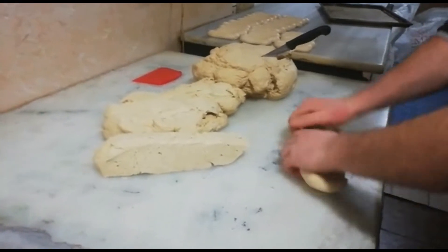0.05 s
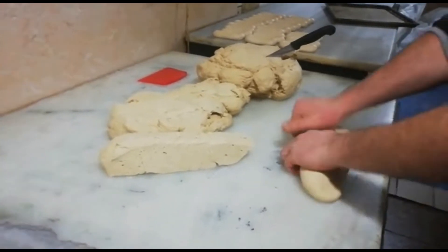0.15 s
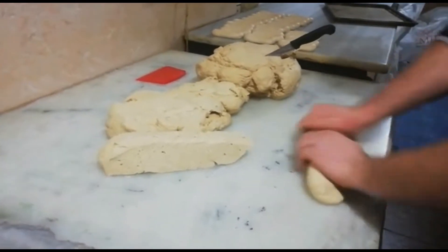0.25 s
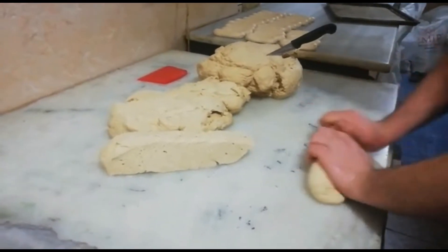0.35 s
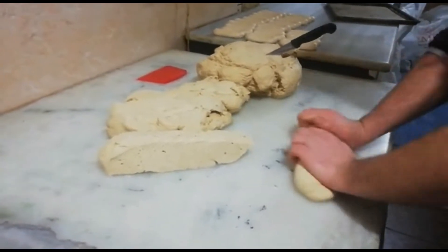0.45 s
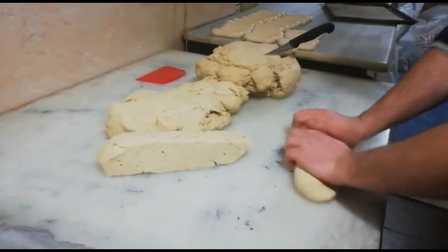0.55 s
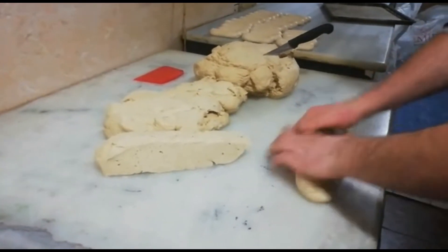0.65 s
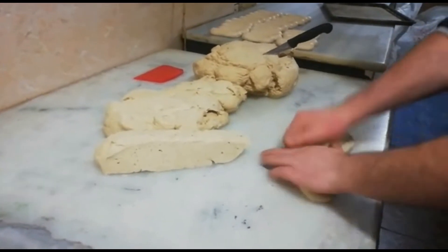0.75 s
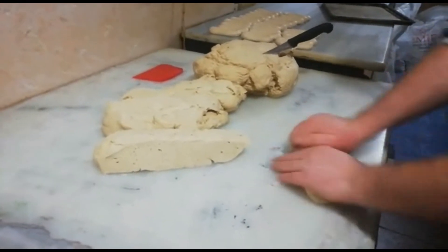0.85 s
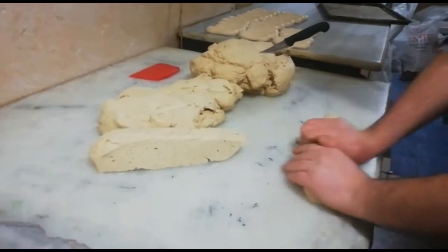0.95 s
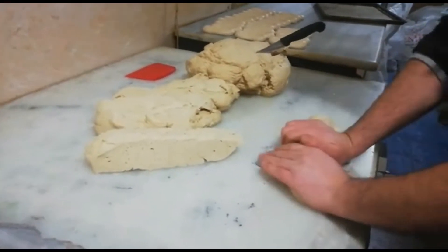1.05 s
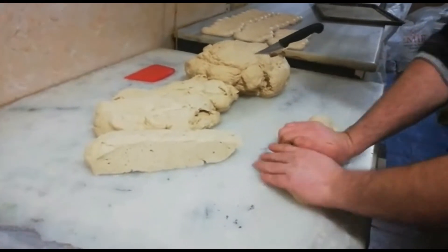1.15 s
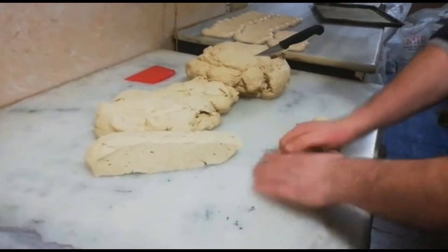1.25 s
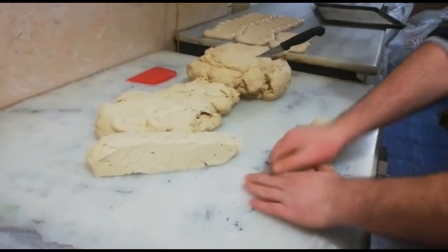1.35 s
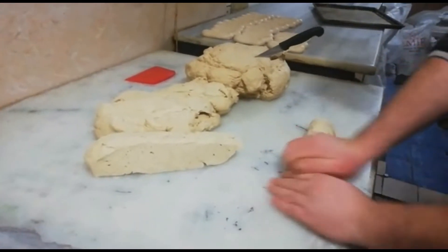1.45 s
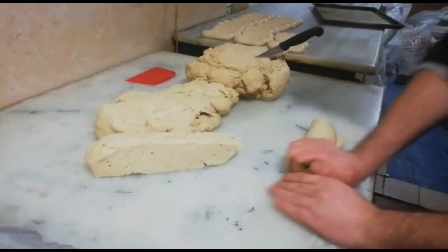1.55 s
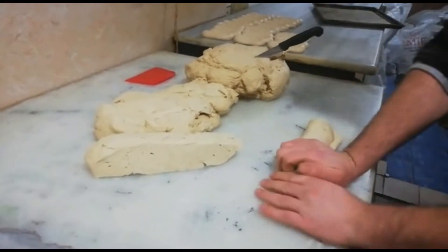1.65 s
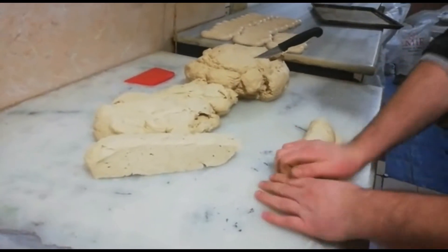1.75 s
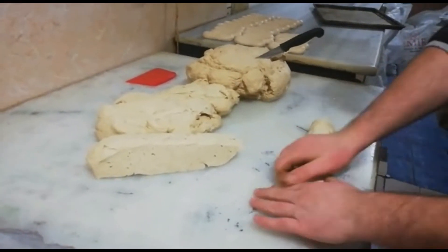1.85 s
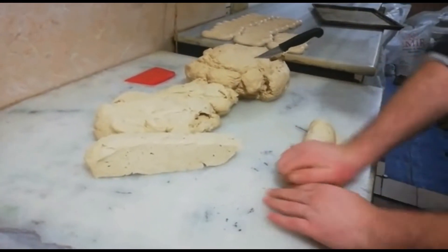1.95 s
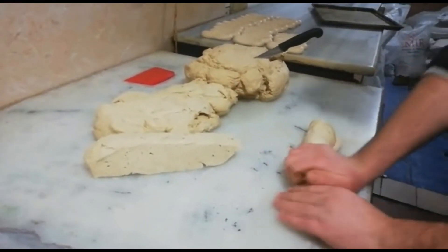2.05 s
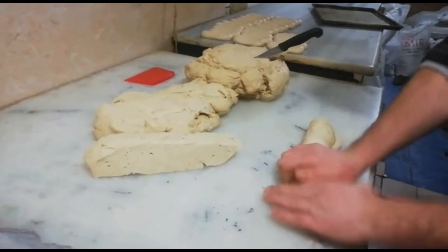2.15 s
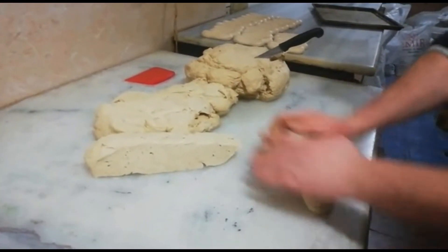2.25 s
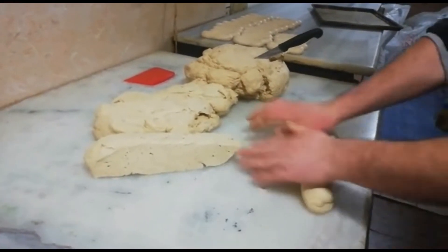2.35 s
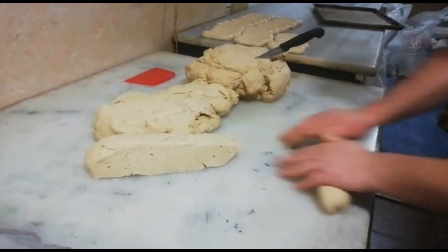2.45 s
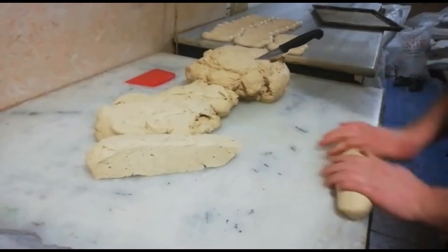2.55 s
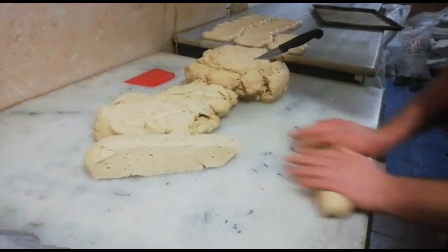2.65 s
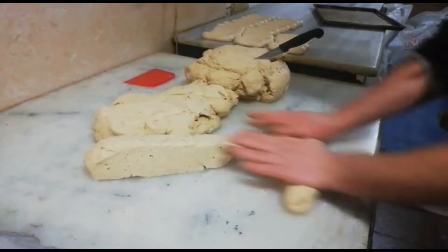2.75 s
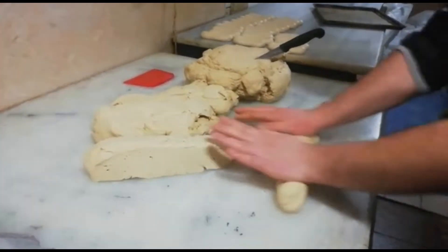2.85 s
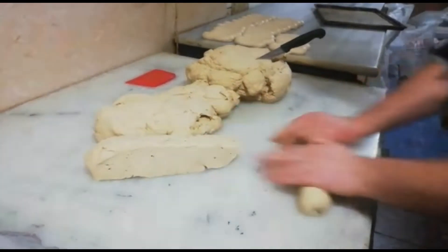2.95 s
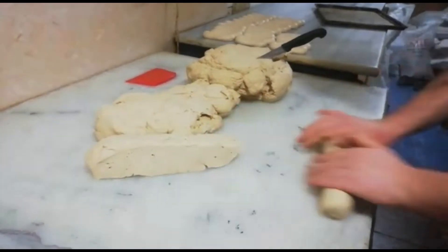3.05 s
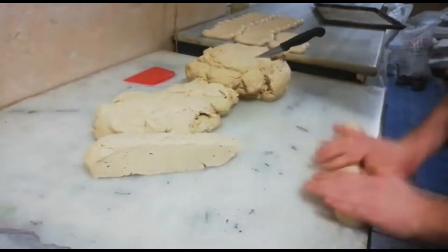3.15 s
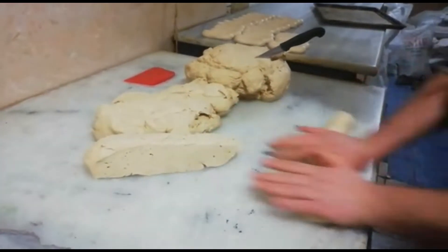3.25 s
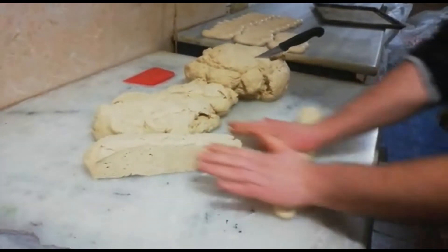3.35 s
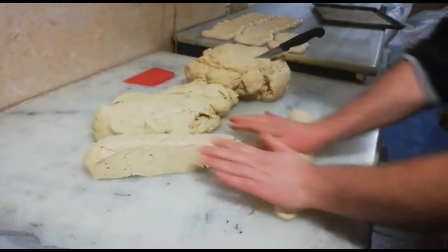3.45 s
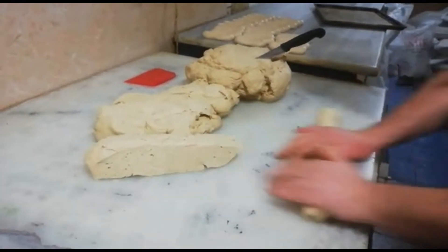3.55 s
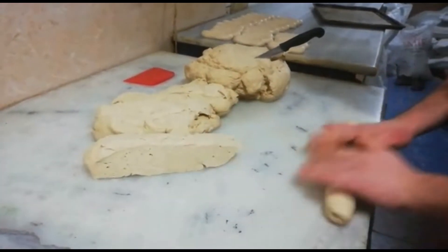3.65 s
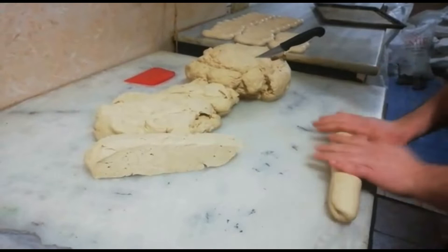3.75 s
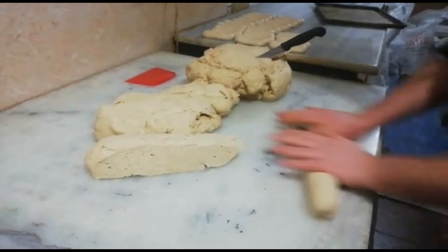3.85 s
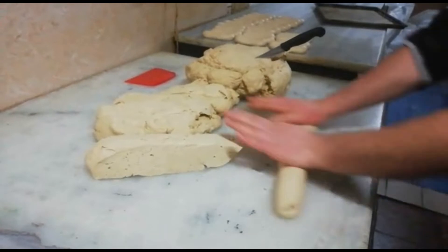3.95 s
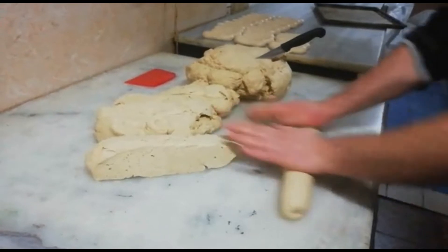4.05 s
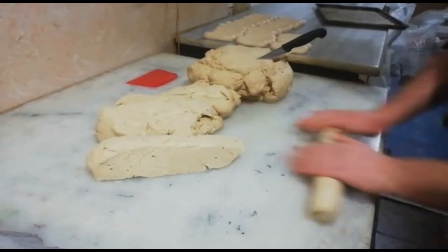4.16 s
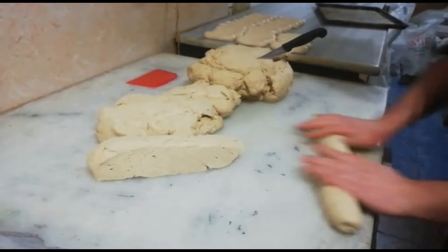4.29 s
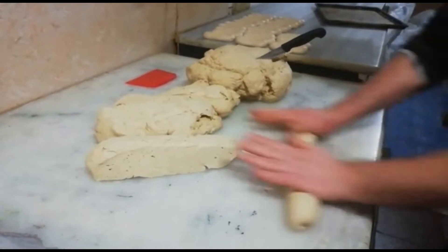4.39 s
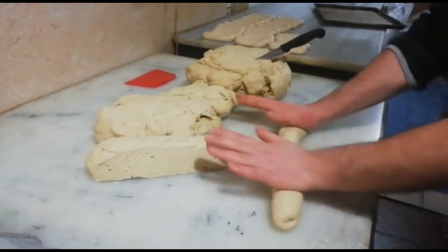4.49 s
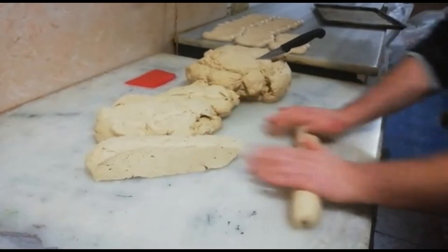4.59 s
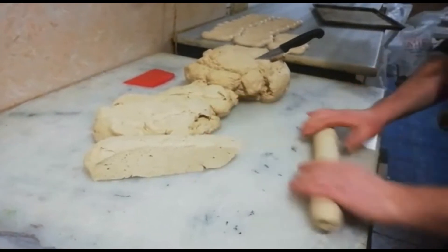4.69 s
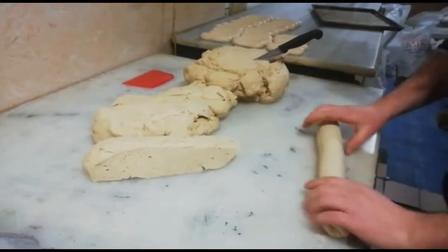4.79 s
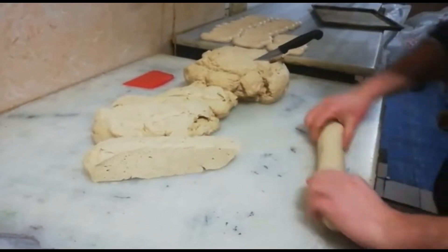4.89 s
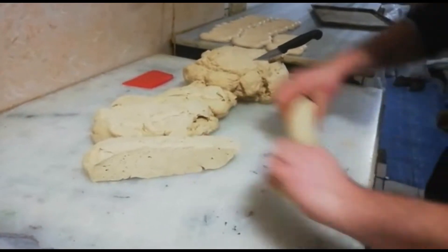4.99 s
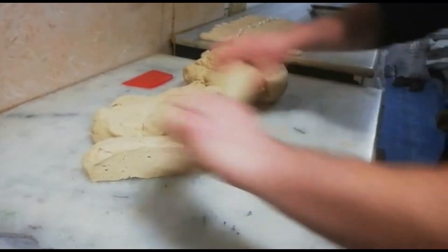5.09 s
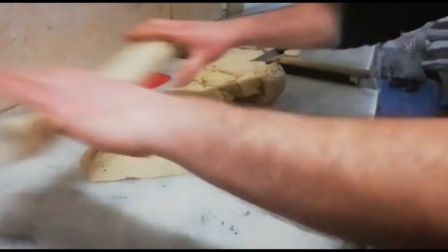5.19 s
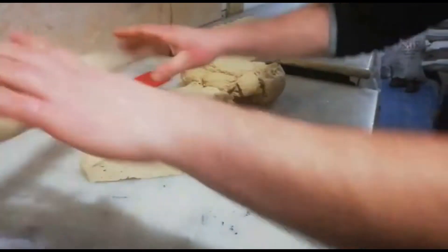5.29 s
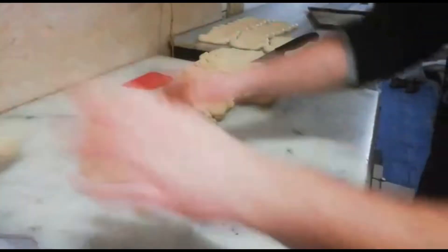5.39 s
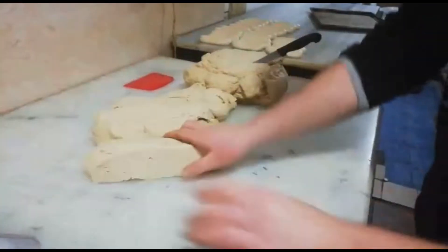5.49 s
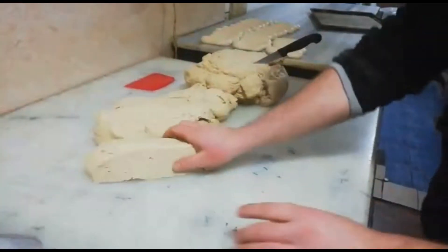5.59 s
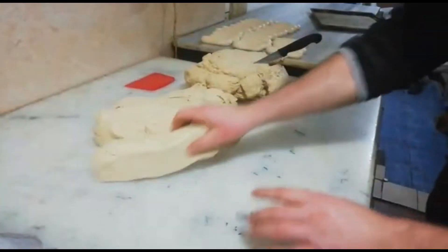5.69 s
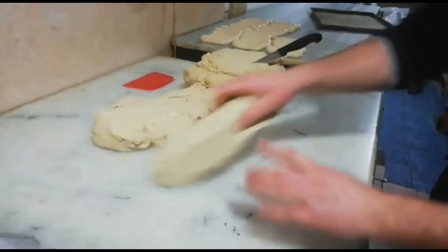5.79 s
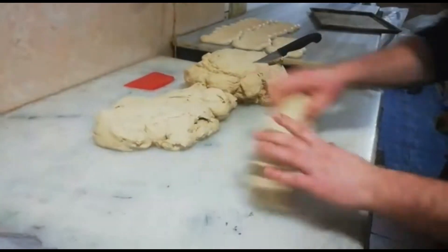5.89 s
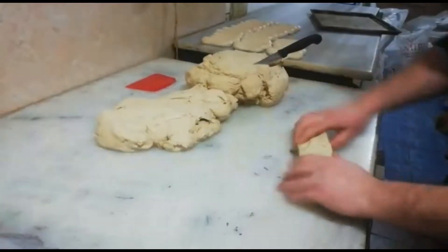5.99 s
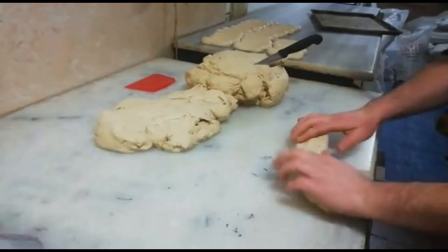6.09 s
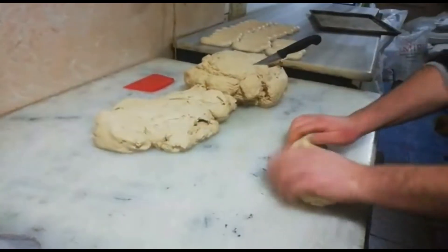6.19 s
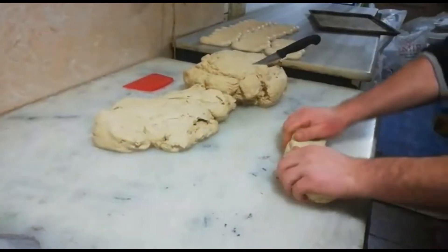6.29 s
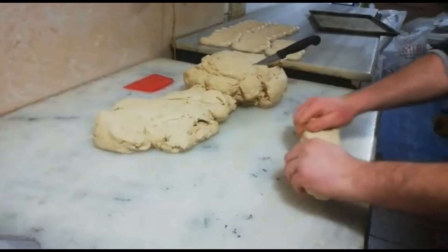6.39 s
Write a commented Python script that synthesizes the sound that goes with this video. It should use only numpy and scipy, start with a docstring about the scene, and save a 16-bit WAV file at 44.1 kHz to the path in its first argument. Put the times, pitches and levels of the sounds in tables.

```python
"""In a hard-walled bakery, dough is kneaded and rolled by hand on a stone-topped work table.
Pushes knock and judder the table's modes, soft blows rock its frame, and palms scuff as shaped noise.
A roll is slapped on the far side (cracks and a splash of noise), a slab is dropped; a cooling unit
hums in steady lines. Two microphones stand a hand apart, the baker nearer the right one."""
import sys
import numpy as np
from scipy import signal
from scipy.io import wavfile

SR = 44100
rng = np.random.default_rng(int(sys.argv[2]) if len(sys.argv) > 2 else 0)


def pcm_store(signal):
    """Save signal as 16-bit PCM."""
    levels = np.round(np.clip(np.atleast_2d(signal), -1, 1) * 32767)
    wavfile.write(sys.argv[1], SR, levels.astype(np.int16).T)


N = 283695

# room air: (frequency [Hz], relative level [dB per Hz])
AIR_SPECTRUM = [(20, -11), (50, 6.5), (80, -2), (130, -4), (200, -4), (260, -9), (400, -14.5), (630, -21.5),
                (1300, -19), (2500, -20.5), (5000, -25), (7500, -23), (10500, -24), (15700, -24)]
AIR_DB = -60.5   # rms
# motor and mains lines of the cooling unit: (frequency [Hz])
HUM_HZ = [91.3, 100, 145.4, 290.8, 295.8, 678.5, 969.2, 1017.7]
# mean strength of those lines: (rms level [dB])
HUM_DB = [-65, -63.5, -72, -81.5, -78, -84.5, -74.5, -73]
# decay of the echo: (frequency [Hz], t60 [s])
WALLS = [(60, 0.35), (300, 0.38), (1500, 0.42), (6000, 0.42), (14000, 0.25)]
# left-right correlation of noise: (frequency [Hz], likeness [0 to 1])
LIKENESS = [(30, 0.98), (150, 1), (400, 0.33), (2000, 0.077), (12000, 0.076)]
# airy whistle of two fast strokes: (start [s], length [s], upper band [Hz], lower band [Hz], level [dB])
WHISTLES = [(3.4, .22, 9400, 4210, -58.5), (3.902, .1, 8650, 4370, -58.5)]
# short bright puffs of contact, skin on dough, dough on stone, the slab's first edge landing:
# (time [s], peak [dB], colour [Hz], t60 [s])
CONTACTS = [(0.0375, -51, 6100, 0.043), (0.1524, -41, 4830, 0.041), (0.6183, -39, 6100, .05),
            (0.7824, -36, 5000, 0.061), (1.0574, -35, 2470, 0.069), (1.058, -40.5, 4800, 0.074),
            (1.2144, -50, 5760, 0.078), (1.783, -45, 6340, 0.035), (3.31, -55, 8300, 0.047),
            (4.046, -43.5, 9000, 0.036), (4.83, -42.5, 1280, 0.26), (5.2041, -48.5, 7500, 0.022),
            (5.6974, -30, 7540, .03), (6.012, -31, 2270, 0.035), (6.017, -26.5, 6550, 0.061),
            (6.277, -40, 1720, 0.013)]
# flat of the hand on the roll: (time [s], peak [dB], factor on t60 [1])
PATS = [(3.189, -45, 0.5), (3.784, -41, 1.3)]
# a pat's thump and bright smack: (frequency [Hz], relative peak [dB], t60 [s])
PAT_PARTS = [(803, 0, 0.09), (3700, -2.5, .22), (6470, 0.5, .12)]
# noise splash of the slap: (frequency [Hz], peak [dB], t60 [s])
SLAP_SPLASH = [(264, -38, 0.64), (730, -30, .44), (2160, -30.5, 0.27), (4370, -23.5, 0.14),
               (7740, -26.5, 0.62), (12000, -30, 0.23)]
# noise splash of the dropped slab: (frequency [Hz], peak [dB], t60 [s])
DROP_SPLASH = [(298, -43, 0.13), (950, -33.5, 0.19), (1850, -20.5, 0.017), (3070, -26, 0.023),
               (6340, -21, 0.094)]
# fine hiss of skin on flour: (frequency [Hz], relative level [dB per Hz])
HISS_SPECTRUM = [(1000, -4.5), (1800, 2.5), (3000, 1), (4300, 5.5), (5500, 3.5), (7800, 9.5), (9500, 4),
                 (11500, -2), (15700, -7)]
# dull drag of dough: (frequency [Hz], relative level [dB per Hz])
DRAG_SPECTRUM = [(300, -25), (700, 1.5), (1100, 2.5), (1800, -6), (2600, 1), (4000, -71)]
# palms and dough over floured stone:
# (loudest at [s], hiss level [dB], swell [s], fade [s], drag relative to the hiss [dB], held to -5 at most)
STROKES = [(0.041, -45.5, 0.052, 0.074, -8.5), (0.158, -53.5, 0.12, 0.26, -4),
           (0.434, -57.5, 0.026, 0.08, -7), (0.652, -42, 0.039, 0.074, -12), (0.78, -49, 0.065, 0.26, -2),
           (1.0, -55.5, .02, 0.13, -12), (1.07, -49.5, 0.022, 0.067, 2), (1.225, -47.5, 0.02, 0.15, -9),
           (1.43, -57, .06, 0.089, -26), (1.53, -54, 0.1, 0.044, -28), (1.67, -55.5, 0.12, 0.078, -20),
           (1.787, -50, 0.02, 0.12, -11), (1.975, -59.5, .08, 0.21, -14), (2.21, -59, .015, .1, -9),
           (2.268, -53, .07, 0.063, -8.5), (2.462, -53.5, 0.035, .2, -12), (2.645, -54, .05, 0.34, -30),
           (2.84, -55.5, .2, .07, -13), (3.02, -53, 0.086, 0.14, -14), (3.12, -53, 0.092, 0.11, -21),
           (3.194, -52, 0.01, 0.035, -5), (3.318, -61, 0.049, 0.046, -12), (3.51, -56, 0.31, 0.3, -9.5),
           (3.788, -52, 0.01, 0.094, -17), (3.96, -57.5, 0.12, 0.18, -9), (4.158, -56.5, 0.062, 0.15, -2),
           (4.452, -58.5, 0.19, 0.16, -11), (4.625, -54.5, 0.076, 0.18, -8), (4.81, -50.5, .12, .14, -16.5),
           (5.09, -65.5, .05, 0.075, -13), (5.204, -62.5, .012, .04, -7), (5.62, -53.5, 0.11, 0.081, -14),
           (5.701, -43.5, 0.075, .05, -19.5), (5.77, -49, 0.066, 0.065, -32),
           (6.021, -45, 0.021, 0.069, -3), (6.29, -52.5, 0.27, .06, -12.5), (6.385, -44, 0.061, 0.16, -23)]
# weight of hands or dough coming down:
# (time [s], relative level [dB], tilt of the frame modes [dB per octave], factor on their t60 [1])
THUDS = [(0.124, -38, -13.5, 0.93), (0.251, -47.5, -3, 1.7), (.33, -47, -1, 1.3), (0.748, -31, -4, 0.67),
         (0.861, -52, 2, 4), (0.952, -41, 2, 0.96), (1.328, -42, -3, 0.96), (1.541, -57, -14, 1),
         (1.881, -43, -4, 0.96), (2.461, -44.5, 1, 1.3), (2.969, -50, 3, 0.53), (3.0, -36, 0.5, 0.52),
         (3.205, -49.5, -15.5, 1.7), (3.551, -49, 0, 2), (3.786, -46.5, -7, 1.7), (3.82, -43, -16, 0.42),
         (4.137, -51, -4, 0.92), (4.94, -48.5, 10.5, 0.49), (5.452, -36.5, 7.5, 3.17),
         (6.018, -36.5, -11, 1.4), (6.063, -39, 9, 1.16), (6.263, -58.5, 21.5, 1.6),
         (6.331, -48.5, -2, 0.52)]
# modes of legs and top as a whole: (frequency [Hz], relative level [dB], t60 [s])
FRAME_MODES = [(29.7, -4.5, 0.13), (42.6, -2, 0.07), (63.1, 3, 0.18), (100, -4.5, 0.23),
               (133.4, -4.5, 0.15), (157.3, -21.5, 0.26)]
# contacts of the slap, each three cracks: (time [s], relative peak [dB])
SLAP_CONTACTS = [(5.4492, -20), (5.4532, -7), (5.4606, -12.5), (5.4693, -21), (5.4778, -28)]
# crack colour at the left microphone: (frequency [Hz], width [Hz], level [dB])
SLAP_LEFT = [(1200, 2400, -5), (4130, 1700, 1), (9100, 2900, 0)]
# crack colour at the right microphone: (frequency [Hz], width [Hz], level [dB])
SLAP_RIGHT = [(1200, 660, -15.5), (4270, 650, -20), (6700, 1000, 3.5), (10000, 2200, 2.5)]
# pushes that rock the table: (time [s], relative knock level [dB], tilt of the modes [dB per octave])
PUSHES = [(0.12, -22.5, -5), (0.151, -21.5, 0), (0.355, -28.5, -0.5), (0.407, -46.5, 1.5), (0.53, -42, 1),
          (0.62, -54, 9.5), (0.746, -27.5, -5.5), (0.784, -18.5, -0.5), (0.847, -38, 3), (0.949, -35, -5),
          (0.996, -27, 0.5), (1.019, -45.5, 7), (1.332, -35, -2.5), (1.88, -36.5, -4.5), (1.919, -56, -9),
          (2.455, -48.5, 1), (2.972, -46, -3.5), (3.535, -46.5, -1.5), (4.131, -43.5, -2.5),
          (4.629, -59, 2), (5.732, -51.5, 2), (6.021, -30.5, -3), (6.262, -38, -9.5), (6.309, -49, -9)]
# modes of the top: (frequency [Hz], relative level [dB], longest t60 [s])
TABLE_MODES = [(229.7, -3.5, 0.072), (278, -3, 0.063), (359.6, -2, 0.086), (398.7, -2.5, 0.045),
               (452, -14.5, 0.029), (519.6, -5, 0.045), (596, -28, 0.041), (717, -4, 0.053),
               (733, -2.5, 0.057), (826, 3, 0.029), (914, 1, 0.059), (966, 3.5, .04), (1034, -12.5, .04),
               (1077, 3.5, 0.021), (1264, -3, 0.0099), (1478, -3, 0.03), (1506, -10.5, 0.016),
               (1644, -1.5, 0.029), (1865, -5.5, 0.016), (2110, -14, 0.0054), (2280, -7, 0.013),
               (2520, -12.5, 0.013)]
# difference in colour of the microphones: (frequency [Hz], left minus right [dB])
LEFT_MINUS_RIGHT = [(110, 0), (380, -2.5), (2400, -3), (4400, -5.5), (8100, -4), (15000, 2.5)]
# fall of both microphones above their port resonance: (frequency [Hz], level [dB])
MICROPHONE = [(9300, 0.5), (10400, -6.5), (15000, -5.5)]

EDGES_HZ = 20 * 2 ** (np.arange(30) / 3)   # third octaves
LEFT_LAG, SLAP_LEAD = 26, 20   # samples
CUTOFF_HZ = 15800
WHISTLE_FALL = 0.12   # share by which the upper band sinks over a stroke
CONTACT_WIDTH, PAT_WIDTH = 1.444, 1.235   # colour band reaches this factor above and below its centre
SLAP_S, DROP_S = 5.451, 6.024
STROKE_DEPTH_DB, STROKE_ROUNDING = 12.5, 1.25   # drop over one swell or fade time; above 1 rounds the top
# a heavier drag also fills the lower part of the hiss, dB per dB
HISS_SPLIT_HZ, LOW_HISS_FOLLOWS, USUAL_DRAG_DB = 4600, 0.33, -12
CRACK_SPREAD_S = .0016
JUDDER_T60_S, JUDDER_S_PER_DB = .25, 0.0121   # for a -30 dB knock, at 400 Hz; softer pushes judder longer
SLIPS_PER_S, SLIP_SHARE = 900, 0.33   # share: size of slips against the knock, before their own spread
HIGH_MODES_QUIETEN = 0.4   # power of pitch by which the judder dies sooner
OPPOSITE = np.array([[1], [-1]])   # side signal: plus on the left, minus on the right


def from_db(db):
    """Logarithmic level: decibels become an amplitude gain."""
    return 10 ** (np.asarray(db) / 20)


def rms_one(x):
    """Normalisation of mean power: the signal is scaled to rms 1."""
    return x / np.sqrt(np.mean(x ** 2) + 1e-20)


def at_hz(points, hz):
    """Logarithmic pitch: a (frequency, value) table is read on a log axis."""
    table_hz, values = np.array(points)[:, :2].T
    return np.interp(np.log(hz), np.log(table_hz), values)


def bandpass(x, low_hz, high_hz):
    """Band limitation by a Butterworth filter."""
    return signal.sosfilt(signal.butter(2, [low_hz, high_hz], "band", fs=SR, output="sos"), x)


def drift(rate_hz):
    """Low-passed random fluctuation of rms 1, computed at every 40th sample."""
    r = np.exp(-80 * np.pi * rate_hz / SR)
    slow = signal.lfilter([1], [1, -2 * r, r * r], rng.standard_normal(N // 40 + 2002))[2000:]
    return np.interp(np.arange(N) / 40, np.arange(len(slow)), rms_one(slow))


def ring(x, hz, t60):
    """Damped resonance: a unit click starts a decaying sine of initial height 1."""
    r, w = from_db(-60 / (t60 * SR)), 2 * np.pi * hz / SR
    return signal.lfilter([0, np.sin(w)], [1, -2 * r * np.cos(w), r * r], x + 1e-18)


def at_times(times, sizes):
    """Impulsive excitation: a train of single-sample clicks."""
    clicks = np.zeros(N)
    np.add.at(clicks, (np.asarray(times) * SR).astype(int), sizes)
    return clicks


def near(pair):
    """Arrival-time difference: sound from the baker's side reaches the left microphone later."""
    return np.array([np.roll(pair[0], LEFT_LAG), pair[1]])


def bands(white):
    """Third-octave analysis of mid and side noise; neighbouring bands are unrelated."""
    for k, (low, high) in enumerate(zip(EDGES_HZ, EDGES_HZ[1:])):
        yield np.sqrt(low * high), bandpass(white[k % 2], low, high)


def coloured(spectrum, patchy_db, alike_power):
    """Spectral shaping and partial coherence: each noise band has its level, flicker and likeness; rms 1."""
    out, together = 0, drift(27.0)
    for hz, (mid, side) in bands(rng.standard_normal((2, 2, N))):
        alike = np.clip(at_hz(LIKENESS, hz), 0, 1) ** alike_power
        flicker_db = patchy_db * (0.31 * together + drift(34.5))
        gain = from_db(at_hz(spectrum, hz) + flicker_db)
        out = out + gain * (np.sqrt(1 + alike) * mid + np.sqrt(1 - alike) * side * OPPOSITE)
    return rms_one(out)


def hum():
    """Steady tonal lines of the cooling unit; phase difference between microphones grows with pitch."""
    out, t = 0, np.arange(N) / SR
    for hz, db in zip(HUM_HZ, HUM_DB):
        phase = 2 * np.pi * (hz * t + rng.random()) + hz / 500 * np.array([[0], [1]])
        out = out + from_db(db + 1.36 * drift(2.5)) * np.sqrt(2) * np.sin(phase)
    return out


def air():
    """Broadband ambient noise: the air of the room."""
    return from_db(AIR_DB) * coloured(AIR_SPECTRUM, patchy_db=0.64, alike_power=1.3)


def room(x):
    """Diffuse reverberation: noise dying band by band, coherent between microphones only in the bass."""
    t, tail = np.arange(SR) / SR, 0
    for hz, pair in bands(rng.standard_normal((2, 2, SR))):
        t60 = at_hz(WALLS, hz)
        apart = min(hz / 400, 1) ** 7.9
        # band energy grows with its width and decay time
        mid, side = [rms_one(noise * from_db(-60 * t / t60)) * np.sqrt(hz * t60) for noise in pair]
        tail = tail + mid + apart * side * OPPOSITE
    tail = tail * (1 - np.exp(-t / 0.00076))
    tail = tail / np.sqrt(np.sum(tail ** 2) / 2)
    return signal.fftconvolve(x[None], tail, axes=1)[:, :N]


def whistle():
    """Amplitude modulation of a carrier by slow noise: two narrow bands swell and fade with the stroke."""
    t, out = np.arange(N) / SR, 0
    for s, length, upper_hz, lower_hz, db in WHISTLES:
        done = np.clip((t - s) / length, 0, 1)
        upper = (upper_hz * (1 - WHISTLE_FALL * done), 250, 0)
        lower = (np.full(N, lower_hz), 120, -6)
        for hz, width_hz, band_db in (upper, lower):
            lowpass = signal.butter(2, width_hz, fs=SR, output="sos")
            wobble = rms_one(signal.sosfilt(lowpass, rng.standard_normal((2, N))))
            carrier = np.sqrt(2) * np.sin(2 * np.pi * np.cumsum(hz) / SR)
            out = out + from_db(db + band_db) * np.sin(np.pi * done) * wobble * carrier
    return out


def puffs(events, width):
    """Decaying band noise: puffs start at once; each channel mixes shared noise with noise of its own."""
    out, t = np.zeros((2, N + SR)), np.arange(SR // 2) / SR
    for s, db, hz, t60 in events:
        shared, *own = rng.standard_normal((3, len(t)))
        noise = (shared + .9 * np.array(own)) * from_db(-60 * t / max(t60, .005))
        puff = bandpass(noise, hz / width, min(hz * width, 15000))
        at = int(s * SR)
        out[:, at:at + len(t)] += puff / np.abs(puff).max() * from_db(db)
    return out[:, :N]


def contacts():
    """Brief contact noise: each touch of skin, dough or stone is one short puff around its colour."""
    return puffs(CONTACTS, CONTACT_WIDTH)


def pats():
    """Impact of the flat hand: simultaneous puffs give a thump and a bright smack."""
    events = [(s, db + part_db, hz, t60 * factor)
              for s, db, factor in PATS for hz, part_db, t60 in PAT_PARTS]
    return puffs(events, PAT_WIDTH)


def splashes():
    """Broadband impact noise: slap and drop each spread over bands with their own decay."""
    impacts = ((SLAP_S, SLAP_SPLASH), (DROP_S, DROP_SPLASH))
    events = [(s, db, hz, t60) for s, parts in impacts for hz, db, t60 in parts]
    return puffs(events, CONTACT_WIDTH)


def slap():
    """Impulse response of damped resonances: dry cracks, coloured per microphone, reach the left first."""
    s, db = np.repeat(SLAP_CONTACTS, repeats=3, axis=0).T
    s = s + CRACK_SPREAD_S * (np.arange(len(s)) % 3 - 1 + rng.uniform(-.5, .5, len(s)))
    cracks = at_times(s, from_db(db) * rng.choice([-1, 1], len(s)))
    heard = []
    for colours in (SLAP_LEFT, SLAP_RIGHT):
        sound = 0
        for k, (hz, width_hz, level_db) in enumerate(colours):
            t60 = np.log(1000) / (np.pi * width_hz)
            sound = sound + from_db(level_db) * ring(cracks, hz, t60) * (-1) ** k
        heard.append(sound)
    left, right = heard
    return np.array([np.roll(left, -SLAP_LEAD), right])


def scuffs():
    """Sliding friction: hiss of skin on flour and duller drag of dough swell and fade with each stroke."""
    t, hiss, drag = np.arange(N) / SR, 0, 0   # hiss and drag are powers
    for s, hiss_db, swell, fade, dull_db in STROKES:
        away = np.abs(t - s) / np.where(t < s, max(swell, .005), max(fade, .005))
        drop_db = STROKE_DEPTH_DB * np.minimum(away, 10) ** STROKE_ROUNDING
        power = from_db(2 * (hiss_db - drop_db))
        hiss = hiss + power
        drag = drag + power * from_db(2 * min(dull_db, -5.0))
    fine = coloured(HISS_SPECTRUM, patchy_db=1.37, alike_power=4.0)
    low = signal.sosfiltfilt(signal.butter(2, HISS_SPLIT_HZ, fs=SR, output="sos"), fine)
    drag_db = 10 * np.log10((drag + 1e-30) / (hiss + 1e-29))
    low_gain = from_db(LOW_HISS_FOLLOWS * (drag_db - USUAL_DRAG_DB))
    dull = coloured(DRAG_SPECTRUM, patchy_db=0.8, alike_power=1.0)
    return near(np.sqrt(hiss) * (fine - low + low * low_gain) + np.sqrt(drag) * dull)


def thuds():
    """Low-frequency modal response: soft blows make frame modes swell over milliseconds and die."""
    out, t = np.zeros(N + SR), np.arange(SR) / SR
    for s, thud_db, tilt_db, freedom in THUDS:
        sway = 0
        for hz, db, t60 in FRAME_MODES:
            level_db = db + tilt_db * np.log2(hz / 62) - 60 * t / (t60 * freedom)
            sway = sway + from_db(level_db) * np.sin(2 * np.pi * hz * t)
        at = int(s * SR)
        out[at:at + SR] += from_db(thud_db) * sway * (1 - np.exp(-t / 0.0073))
    return out[:N]


def table():
    """Stick-slip excitation of plate modes: each push is a knock followed by a run of small slips."""
    t, out = np.arange(SR // 2) / SR, np.zeros((2, N))
    occurs = rng.random(N + SR) < SLIPS_PER_S / SR
    size = from_db(2.5 * np.minimum(rng.exponential(1, N + SR), 4))
    slips = occurs * size * rng.choice([-1, 1], N + SR)
    for k, (hz, mode_db, t60) in enumerate(TABLE_MODES):
        force = np.zeros(N + SR)
        own = np.roll(slips, rng.integers(N))   # each mode feels slips of its own
        for s, knock_db, tilt_db in PUSHES:
            judder = max(JUDDER_T60_S - JUDDER_S_PER_DB * (knock_db + 30), .01)
            dying = from_db(-60 * t / judder * (hz / 400) ** HIGH_MODES_QUIETEN)
            at = int(s * SR)
            run = own[at:at + len(t)] * SLIP_SHARE * dying
            run[0] = 1   # the knock
            spot_db = rng.normal(0, 2.9)   # where the push lands favours some modes
            force[at:at + len(t)] += run * from_db(knock_db + tilt_db * np.log2(hz / 400) + spot_db)
        # dough and hands damp every mode within some cycles
        sound = ring(force[:N], hz, min(t60, 17.0 / hz)) * from_db(mode_db - 9.5) * (-1) ** k
        # the top is wide: each mode radiates from another part of it
        out += [np.roll(sound, rng.integers(-7, 5)), sound]
    return out


def scene():
    """Superposition of background, direct sound and its echo from the walls."""
    background = hum() + air()
    rub = whistle() + scuffs()
    puff = contacts() + pats() + splashes()
    crack, frame, top = slap(), thuds(), table()
    direct = near(top + puff) + frame + crack
    sent = from_db(-2.5) * top[1] + from_db(-7.0) * frame
    sent = sent + from_db(-4.5) * puff[1] + from_db(-7) * crack.mean(axis=0)
    return background + rub + direct + room(sent)


def record(dry):
    """Linear filtering: each microphone has its own minimum-phase colour, and the top is cut."""
    hz = np.linspace(0, SR / 2, 257)
    common_db, half_db = at_hz(MICROPHONE, hz + 1), at_hz(LEFT_MINUS_RIGHT, hz + 1) / 2
    heard = []
    for sign, x in zip((1, -1), dry):
        # the minimum-phase form has the square root of the designed gain
        design = signal.firwin2(513, hz, from_db(2 * (common_db + sign * half_db)), fs=SR)
        heard.append(signal.lfilter(signal.minimum_phase(design), 1, x))
    return signal.sosfilt(signal.ellip(12, .3, 90, CUTOFF_HZ, fs=SR, output="sos"), heard)


dry = scene()
out = record(dry)
pcm_store(out)
```